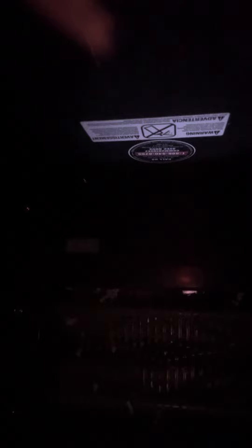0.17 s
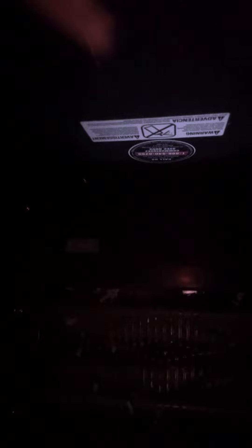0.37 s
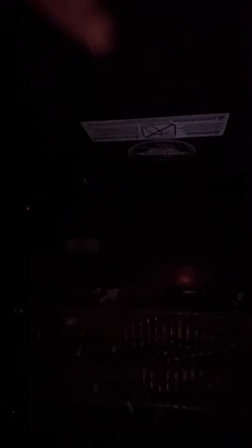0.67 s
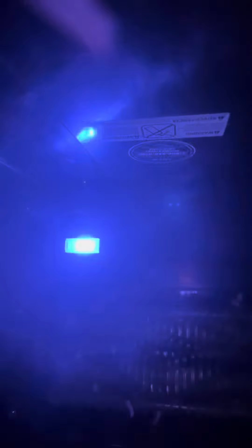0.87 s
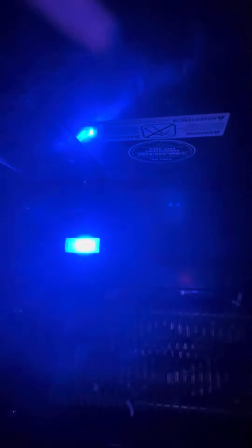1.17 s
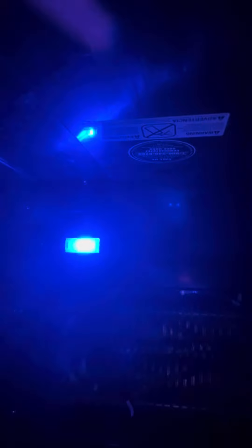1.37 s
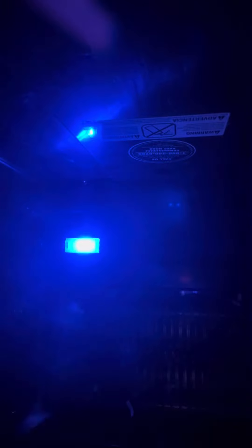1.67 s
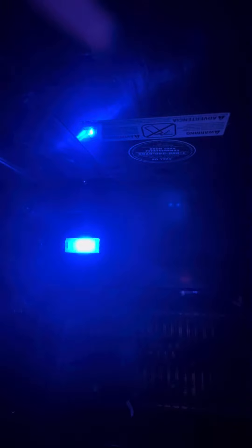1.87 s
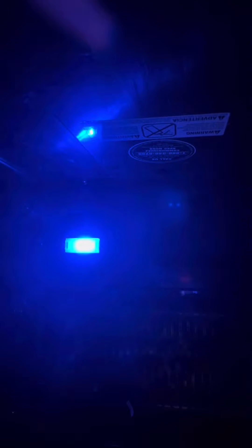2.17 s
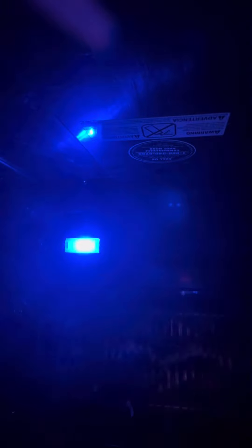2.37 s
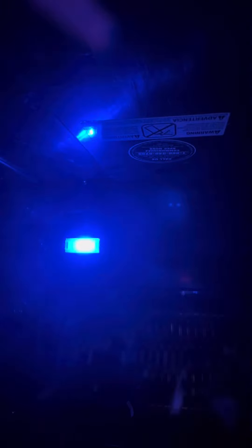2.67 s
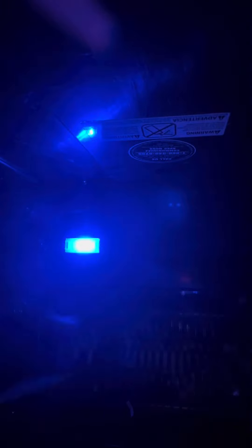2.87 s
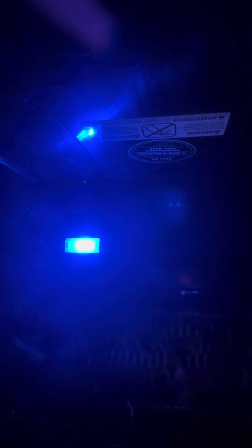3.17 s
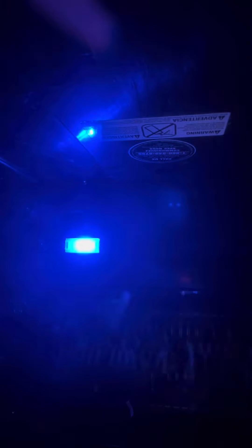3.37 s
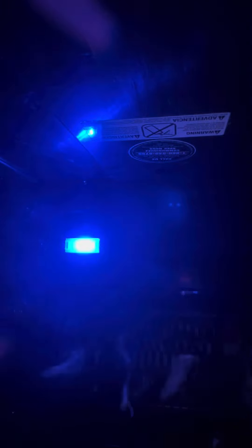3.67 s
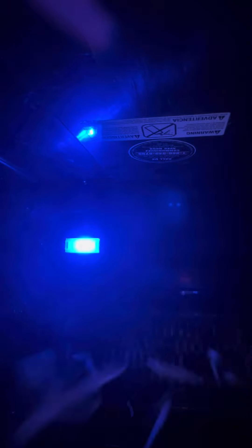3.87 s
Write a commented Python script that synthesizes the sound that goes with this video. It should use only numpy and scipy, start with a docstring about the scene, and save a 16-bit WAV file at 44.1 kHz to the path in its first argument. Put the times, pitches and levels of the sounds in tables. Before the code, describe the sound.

A paper shredder clicks on, hums and grinds, then cuts paper with crackling snaps.

```python
"""A paper shredder, heard close up in stereo. Over room tone and a faint whine, fingers fumble on the
casing and a switch clicks twice. At about 0.75 s the induction motor runs up with a short growl and
settles into mains hum, shaft tones and a gear grind that rings in the casing. From about 1.3 s to the end
the cutters bite paper: patchy hiss, the crackle of breaking fibres and sharp snaps."""
import sys
import numpy as np
from scipy import signal
from scipy.fft import rfft, irfft, next_fast_len
from scipy.io import wavfile
from scipy.ndimage import uniform_filter1d, map_coordinates

SR = 44100
rng = np.random.default_rng(int(sys.argv[2]) if len(sys.argv) > 2 else 0)


def to_wav(sig):
    """Store sig (one row per channel, or 1-D mono) as 16-bit WAV at the path in sys.argv[1].

    Samples outside -1..1 are clipped; the rate is SR.
    """
    pcm = np.clip(np.atleast_2d(sig), -1, 1) * 32767
    pcm = np.round(pcm).astype(np.int16)
    wavfile.write(sys.argv[1], SR, pcm.T)  # frames by channels


N = 176400
T = np.arange(N) / SR

# Level rides. Each row: time in seconds, relative level in dB.
HUM_RIDE = [(0.74, -28), (0.77, -18), (0.86, -8.5), (1.15, -5.5), (1.55, -10), (1.59, -17), (1.64, -5),
            (1.69, -16), (1.73, -8), (1.77, -6), (1.81, -12.5), (1.87, -5.5), (1.91, -16), (1.96, -6.5),
            (2.01, -17), (2.04, -11.5), (2.63, -7.5), (2.75, -10), (2.81, -13), (2.99, -9), (3.36, -9),
            (3.44, -20), (3.48, -9.5), (3.71, -10), (3.74, -16), (3.94, -9.5), (4.0, -11)]  # sags as the cutters load the motor
FOURTH_ORDER_RIDE = [(0.72, -49), (0.84, -23), (1.04, -21), (1.14, -36.5), (1.25, -24), (2.17, -24.5),
                     (2.36, -28), (3.95, -28.5)]
RUMBLE_RIDE = [(0.74, -17), (0.78, -29.5), (1.59, -32.5), (1.69, -29), (1.78, -34.5), (4.0, -38)]
WHIRR_RIDE = [(.74, -39.5), (.86, -35.5), (.93, -40.5), (1.3, -37), (4, -44.5)]
HISS_RIDE = [(1.3, -39.5), (1.48, -36), (2.1, -39), (2.21, -36.5), (2.58, -41.5), (2.95, -39.5),
             (3.13, -42), (4.0, -40)]
# Quiet shaft overtones. Each row: multiple of the shaft speed, level in dB.
SHAFT_ORDERS = [(3, -40.5), (10, -43.5), (12, -48.5)]
# Resonances. Each row: centre in Hz, width in Hz, gain in dB.
CASING_MODES = [(48.7, 16, -9.5), (131.6, 8, 13.5), (190, 10.3, 2.5), (286, 26, -6), (471, 27.8, 2.5),
                (754, 91, -6.5), (1202, 39, -18.5), (2750, 610, -14)]
CUTTER_MODES = [(2350, 35, 11), (4220, 260, 7), (6360, 420, -4)]  # the cutter shafts ring when paper tears
# Noise colours. Each row: frequency in Hz, relative level in dB.
GRIND_EQ = [(20, -19), (90, 10.5), (400, -9.5), (1000, -15.5), (3500, -25.5), (7000, -37), (13000, -42.5)]
GROWL_EQ = [(60, -8), (150, 8.5), (500, -6), (800, 6), (1100, -53)]
PAPER_EQ = [(700, -6), (1500, -15), (2400, 0), (3500, -12), (4400, 1.5), (5200, -7), (6100, -0.5),
            (7600, -5.5), (9500, -6.5), (11300, -4), (12400, -3), (13500, -7)]
THUD_EQ = [(30, -43), (75, 8), (150, 5), (220, -14.5), (300, -60)]
RUB_EQ = [(150, -7), (280, -2.5), (480, -4), (650, -10), (1100, -18.5), (2000, -39.5)]
ROOM_EQ = [(300, 10.5), (1500, -8), (3300, -7.5), (4600, -7.5), (6000, -13), (13400, -32)]
# Burst bands, ordered treble, low, mid, top. Each row: lower and upper edge in Hz.
BURST_BANDS = [(3200, 6500), (900, 1700), (1700, 3200), (6500, 13400)]
# Seconds to fall 60 dB, one for each burst band.
SNAP_DECAYS = [0.044, 0.065, 0.081, 0.022]
CLICK_DECAYS = [0.039, 0.11, 0.08, 0.043]
# Paper snaps. Each row: start in seconds, then treble peak, low, mid and top in relative dB.
SNAP_CUES = [(0.9996, -25, -39, -35, -33.5), (1.295, -8, -21, -26, -30), (1.341, -22, -34, -23, -31),
             (1.452, -19, -54, -37, -35), (1.478, -16.5, -49, -26, -24.5), (1.594, -16.5, -27, -17, -23.5),
             (1.658, -29, -29, -13, -34), (1.6932, -13, -16, -16.5, -16.5), (1.7237, -13, -27, -21, -29),
             (1.739, -14, -34, -34, -28), (1.9016, -20, -31, -27, -20), (1.9324, -9.5, -23, -21, -28),
             (2.008, -13.5, -22.5, -15.5, -19.5), (2.1574, -14, -38, -16.5, -24),
             (2.29, -37, -44, -30, -26.5), (2.5236, -17, -28.5, -26, -30),
             (2.539, -14.5, -37, -25.5, -25.5), (2.604, -14, -36, -16, -23), (2.6362, -14, -31, -28, -23),
             (2.78, -21.5, -19, -18, -30), (2.85, -21.5, -50, -32, -42), (2.8975, -16.5, -19.5, -29, -37),
             (2.983, -24, -27, -28, -33.5), (3.017, -28, -33, -19, -32), (3.073, -21, -53, -21.5, -31.5),
             (3.3528, -21, -40, -41, -38), (3.389, -26, -38, -26, -42), (3.464, -24, -40, -27, -29),
             (3.5705, -19.5, -27, -24, -37), (3.615, -21.5, -32, -40, -33), (3.688, -16, -42, -23, -30),
             (3.7837, -24, -26, -22.5, -32), (3.878, -26, -30, -36, -41), (3.923, -21, -24, -21.5, -45)]
# Switch and finger ticks. Each row: the same columns as a snap, then hold in seconds.
CLICK_CUES = [(0.2646, -39, -55, -59, -58, 0.006), (0.288, -37.5, -39, -57, -69, 0.0051),
              (0.463, -39.5, -37.5, -65, -71, 0.0041), (0.5586, -32.5, -35, -47, -56, 0.0056),
              (0.596, -12.5, -30, -35, -29, 0.0026), (0.613, -37, -31, -37, -73, 0.0056),
              (0.6546, -37, -53, -39, -55, 0.0097), (0.719, -16, -44, -22.5, -26.5, 0.0052)]
# Hand on the casing. Each row: time in seconds, thud level in dB, rub level in dB.
HANDLING_RIDE = [(0.0, -46, -49.5), (0.068, -39, -45), (0.186, -31, -39.5), (0.27, -46, -67),
                 (0.304, -27.5, -37), (0.33, -24, -49), (0.4, -44, -64), (0.504, -39, -45),
                 (0.534, -33, -30), (0.602, -22.5, -36), (0.708, -40, -50.5), (0.76, -19.5, -29)]
# Fingertip knocks. Each row: start in seconds, relative peak in dB.
KNOCK_CUES = [(0.289, -26), (0.385, -30.5), (0.437, -32.5), (0.464, -23), (0.555, -21.5), (0.599, -17),
              (0.623, -22.5), (0.656, -23), (0.72, -20)]
# Stereo image. Each row: frequency in Hz, then the value named alongside.
LEFT_LEAD = [(100, .15), (500, -.1), (600, -2), (720, -3.2), (850, -2.4), (1100, -1.7), (1550, -.4),
             (2300, -1.5), (2700, -3.5), (5200, -3.8), (7000, -4.8), (8000, -5.8), (9000, -6.15),
             (11200, -6.5), (12000, -8), (13000, -9.2)]  # phase lead in radians
LEFT_TILT = [(60, -2.5), (240, -4), (500, -2), (1200, 2), (2200, 0.5), (5000, -1), (12000, 0)]  # left over right in dB
LIKENESS = [(100, 0.96), (450, 0.94), (570, 0.76), (1100, 0.64), (3500, 0.41), (7000, 0.28), (9000, 1),
            (13000, 0.95)]  # left-right likeness from 0 to 1

ON_S, RUNUP_S, RISE_S = .745, .025, .034  # switch-on; time constants of speed and level
HUM_HZ, SHAFT_HZ, GEAR_HZ = 119.95, 59.41, 10.3
BEAT_HZ, BEAT_PEAK_S, BEAT_DEPTH = 4.94, 1.134, .64
CROSSOVER_HZ = 943  # rumble below, whirr above
BITE_S = 1.292  # the paper meets the cutters
CRACKLE_PER_S, CRACKLE_HZ, CRACKLE_CYCLES = 400, 4500, 5
ATTACK_S, SNAP_HOLD_S, KNOCK_T60_S = .0005, .0015, .15
WHINE_HZ, TOP_HZ = 2270, 13460


def motor():
    """The induction motor runs up, its slipping shaft settling just under the mains frequency."""
    since = np.maximum(T - ON_S, 0)
    fade_in = 1 - np.exp(-(since / RISE_S) ** 2)
    speed_hz = SHAFT_HZ * (1 - np.exp(-since / RUNUP_S)) + .057 * wobble(2.82)
    angle = 2 * np.pi * np.cumsum(speed_hz) / SR
    tones = (T > ON_S) * drone(angle) + fade_in * overtones(angle)
    return np.sqrt(2) * tones + fade_in * (growl() + grind(angle))


def drone(angle):
    """Hum at twice the mains, the unbalanced shaft's tone and its fourth order."""
    (hum_db,), (fourth_db,) = curves(HUM_RIDE), curves(FOURTH_ORDER_RIDE)
    surge = np.exp(-((T - .815) / .061) ** 2)  # the shaft shakes during run-up
    unbalance_db = -21.5 + 11 * surge - 2 * (T - 1)
    # The slow gear swings the shaft tone once a turn.
    gear = 1 + .093 * np.sin(2 * np.pi * GEAR_HZ * T + .38 * wobble(1.8))
    hum = amp(hum_db - .5) * np.sin(2 * np.pi * HUM_HZ * T + .33 * wobble(11))
    unbalance = amp(unbalance_db) * gear ** 2 * np.sin(angle)
    fourth = amp(fourth_db + 1.64) * np.sin(4 * angle + .24 * wobble(7.9))
    return hum + unbalance + fourth


def overtones(angle):
    """Swaying shaft orders; the eighth pulses as if beating with an overtone of the hum."""
    orders = sum(amp(db + 4 * np.tanh(wobble(7.3))) * np.sin(round(k) * angle + rng.uniform(0, 2 * np.pi))
                 for k, db in SHAFT_ORDERS)
    beat = 1 + BEAT_DEPTH * np.cos(2 * np.pi * BEAT_HZ * (T - BEAT_PEAK_S))
    return orders + amp(-38.5 + 1.24 * wobble(9)) * beat * np.sin(8 * angle)


def grind(angle):
    """Gear teeth grind through the casing: a low rumble and a brighter whirr."""
    bumps = rng.standard_normal(round(SR / SHAFT_HZ))  # the same rough spots pass on every turn
    repeating = bumps[(angle / (2 * np.pi) % 1 * len(bumps)).astype(int)]
    teeth = rng.standard_normal(N) + np.c_[[0, amp(-3)]] * repeating  # only the whirr repeats
    teeth *= amp(.62 * wobble(150) + .6 * wobble(15))
    teeth *= (1 + .12 * np.sin(angle)) * (1 + .14 * np.sin(2 * np.pi * HUM_HZ * T))

    def split_body(f):
        low_share = 1 / (1 + (f / CROSSOVER_HZ) ** 6)
        body = np.hypot(abs(resonance(f, CASING_MODES)), amp(along(GRIND_EQ, f)))
        return body * np.sqrt([low_share, 1 - low_share])

    rumble, whirr = map(unit, filtered(teeth, split_body))
    rumble_db = curves(RUMBLE_RIDE)[0] + 12
    whirr_db = curves(WHIRR_RIDE)[0] + 1.5 + .94 * wobble(5.32)
    return amp(rumble_db) * rumble + amp(whirr_db) * whirr


def growl():
    """Loose parts rattle during run-up."""
    swell = np.exp(-((T - .784) / .035) ** 2)
    return swell * amp(-18 + 1.9 * wobble(51)) * noise(GROWL_EQ)


def paper():
    """Tearing paper rings the cutters: a bed of hiss and crackle with loud snaps on top."""
    bite = 1 + np.exp(np.clip((BITE_S - T) / .034, -40, 40))
    level = amp(curves(HISS_RIDE)[0] + 4.5) / bite
    bed = hiss()
    snaps = bursts([(*row, SNAP_HOLD_S) for row in SNAP_CUES], SNAP_DECAYS, gain_db=1.5, ring=4.16)
    bed += amp(-9) * crackle()
    return level * filtered(bed, lambda f: 1 + .5 * resonance(f, CUTTER_MODES[:1])) + snaps


def hiss():
    """The hiss of the cut, patchy in both pitch and time."""
    spectrum = signal.stft(noise(PAPER_EQ), nperseg=256)[2]
    patches = uniform_filter1d(uniform_filter1d(rng.standard_normal(spectrum.shape), 8, 0), 10, 1)
    patchy = signal.istft(spectrum * amp(1.2 * unit(patches)), nperseg=256)[1][:N]
    return unit(patchy) * amp(1.2 * wobble(10) + .8 * wobble(70))


def crackle():
    """Fibres break in clumps: short damped pings of random pitch."""
    starts = np.flatnonzero(rng.random(N) < CRACKLE_PER_S / SR * amp(5 * wobble(14)))
    draw, t = rng.standard_normal((len(starts), 2)), T[:400]
    hz = np.clip(CRACKLE_HZ * np.exp(.586 * draw[:, :1]), 1500, 12500)
    size = amp(4 * np.clip(draw[:, 1:], -2.5, 2.5))
    pings = size * np.sin(2 * np.pi * hz * t) * amp(-20 * t * hz / CRACKLE_CYCLES)
    samples = starts[:, None] + np.arange(len(t))
    return unit(np.bincount(samples.ravel(), pings.ravel(), N + len(t))[:N])


def fingers():
    """Thuds, rubs and knocks through the casing, with the ticks of fingers and switch."""
    thud_db, rub_db = curves(HANDLING_RIDE)
    fade_out = np.exp(-(np.maximum(T - .74, 0) / .019) ** 2)
    knocks = sum((T > s) * amp(db - 7 - 60 * np.maximum(T - s, 0) / KNOCK_T60_S) for s, db in KNOCK_CUES)
    thuds = amp(thud_db) * noise(THUD_EQ)
    touches = (amp(rub_db + 2.3 * wobble(71.5)) + knocks) * noise(RUB_EQ)
    return fade_out * (thuds + touches) + bursts(CLICK_CUES, CLICK_DECAYS, gain_db=2, ring=6)


def whine():
    """A faint, wavering tone that fades in at the start."""
    level = amp(-66 + 2.9 * wobble(28)) * np.clip(T / .15, 0, 1) ** 2
    return level * np.sin(2 * np.pi * WHINE_HZ * T + .67 * wobble(27))


def room_tone():
    """A dark, quiet bed of noise."""
    return amp(-49.5 + .9 * wobble(24)) * noise(ROOM_EQ)


def bursts(cues, t60s, gain_db, ring):
    """Noise hits, each band dying at its own speed; the lower bands ring the casing."""
    envelopes, t = np.zeros((len(BURST_BANDS), N + SR)), np.arange(SR // 8) / SR
    for start, peak_db, *levels_db, hold in cues:
        shape = amp(-60 * np.maximum(t - abs(hold), 0) / np.c_[t60s]) * (1 - np.exp(-t / ATTACK_S))
        gains = amp(np.c_[[peak_db - 8, *levels_db]] + gain_db)  # treble runs 8 dB under its peak
        envelopes[:, round(start * SR):][:, :len(t)] += gains * shape
    filters = [signal.butter(2, band, "band", fs=SR, output="sos") for band in BURST_BANDS]
    bands = [unit(signal.sosfilt(sos, rng.standard_normal(N))) for sos in filters]
    treble, low, mid, top = bands * envelopes[:, :N]
    cutters = lambda f: resonance(f, CUTTER_MODES)
    body = lambda f: .27 + ring * resonance(f, CASING_MODES, above_hz=1000) + .25 * cutters(f)
    return filtered(low + mid, body) + filtered(treble, lambda f: .63 + cutters(f)) + top


def resonance(f, modes, above_hz=0):
    """Response of ringing modes, summed with alternating polarity."""
    return sum((-1) ** k * amp(db) * 1j * f * width / (hz * hz - f * f + 1j * f * width)
               for k, (hz, width, db) in enumerate(modes) if hz > above_hz)


def amp(db):
    return 10 ** (np.asarray(db) / 20)


def unit(x):
    return x / np.sqrt(np.mean(x ** 2) + 1e-20)


def along(points, hz):
    """Read (Hz, value) points on a log axis."""
    f, v = np.transpose(points)
    return np.interp(np.log(hz + 1), np.log(f + 1), v)


def curves(rows):
    """One value per sample for each column after the time."""
    times, *columns = np.transpose(rows)
    return [np.interp(T, times, column) for column in columns]


def wobble(rate):
    """A smooth random curve, rate knots a second."""
    return map_coordinates(rng.standard_normal(int(N * rate / SR) + 4), [T * rate])


def filtered(x, response):
    """Shape x with a complex frequency response."""
    size = next_fast_len(N + SR // 2)
    return irfft(rfft(x, size) * response(np.fft.rfftfreq(size, 1 / SR)), size)[..., :N]


def noise(eq):
    """Coloured noise of rms 1."""
    return unit(filtered(rng.standard_normal(N), lambda hz: amp(along(eq, hz))))


def scene():
    """The whole scene in wide stereo: the same events in both channels, with partly different grain."""
    first, second = [whine() + motor() + paper() + fingers() + room_tone() for _ in range(2)]
    side = np.c_[[.5, -.5]]
    spread = lambda f: np.arccos(np.clip(along(LIKENESS, f), 0, 1)) / 2
    mics = lambda f: amp(side * along(LEFT_TILT, f)) * np.exp(1j * side * along(LEFT_LEAD, f))
    centre = filtered(first, lambda f: mics(f) * np.cos(spread(f)))
    width = filtered(second, lambda f: 2 * side * mics(f) * np.sin(spread(f)))
    return centre + width


def record(dry):
    """The phone rounds off the highest peaks and keeps nothing above its band limit."""
    rounded = dry / (1 + abs(dry / 1.02) ** 8) ** (1 / 8)
    return filtered(rounded, lambda hz: hz < TOP_HZ)


dry = scene()
out = record(dry)
to_wav(out)
```